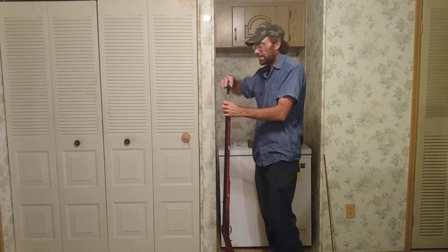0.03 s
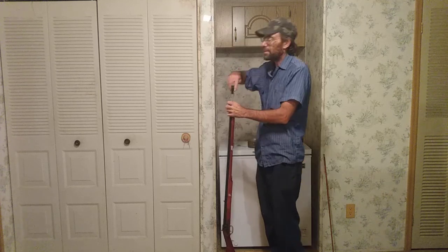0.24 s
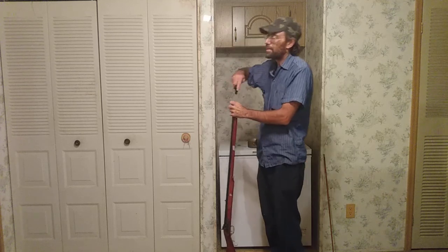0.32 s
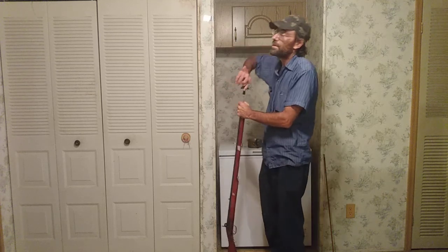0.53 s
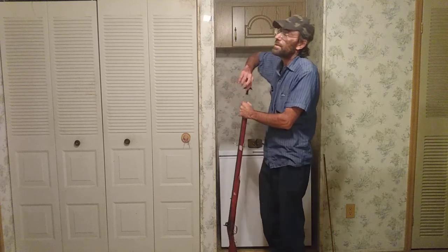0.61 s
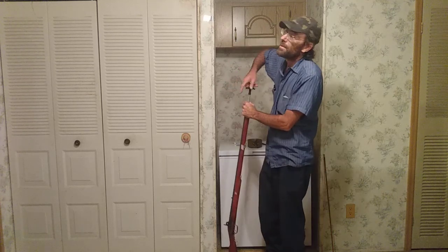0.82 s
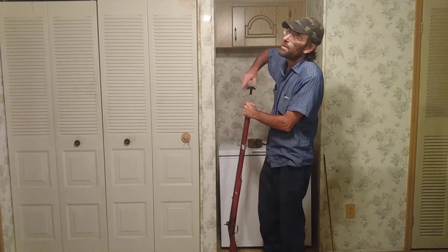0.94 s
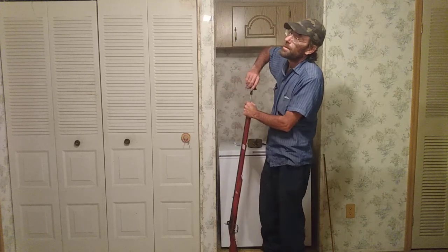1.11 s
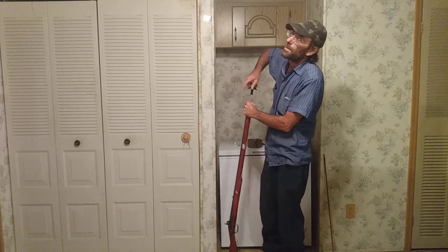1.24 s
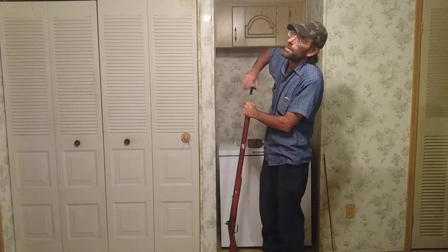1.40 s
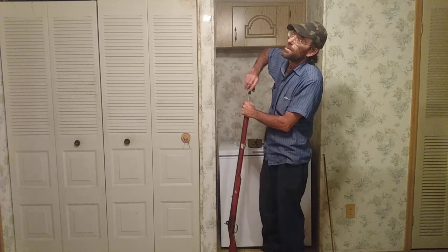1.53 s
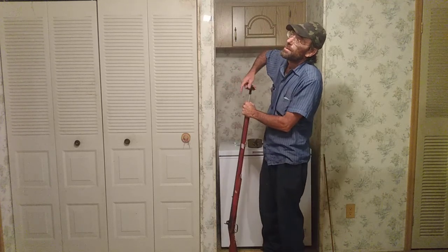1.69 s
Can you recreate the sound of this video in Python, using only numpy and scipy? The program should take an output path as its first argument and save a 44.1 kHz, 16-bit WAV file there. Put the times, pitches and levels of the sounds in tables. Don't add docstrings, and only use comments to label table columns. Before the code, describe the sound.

A metal rod is worked through a long gun barrel in a small room. After near quiet, the wooden stock thumps dully at about 0.2 s. Bright scraping clicks follow at 0.37, then a strong one at 0.6, others at 0.68, 0.9 and 1.06, another strong clack at 1.33, and softer rattles to 1.7. Faint low bumps, short echo and slight hiss lie beneath.

```python
import sys
import numpy as np
from scipy import signal
from scipy.fft import rfft, irfft
from scipy.io import wavfile

SR = 44100
rng = np.random.default_rng(int(sys.argv[2]) if len(sys.argv) > 2 else 0)


def natural_amplitude(level_db):
    exponent = np.asarray(level_db, float) / 20
    return 10 ** exponent


def put_to_file(sound):
    columns = np.atleast_2d(sound).T
    safe = np.clip(columns, -1, 1)
    whole_steps = np.round(safe * 32767)
    wavfile.write(sys.argv[1], SR, whole_steps.astype(np.int16))


N = 77175
LEAD = 4410
SIZE = 32768

# freq_hz, level_db_per_hz
FLOOR_SPECTRUM = [(35, -1.5), (60, 5), (100, -11), (200, -13), (500, -17), (1500, -23), (5000, -26),
                  (16000, -32.5)]
FLOOR_DB, FLOOR_SIDE_GAIN = -80, 0.59
HUM_HZ, HUM_DB = 54, -78

# freq_hz, t60_s
ROOM_T60 = [(300, 0.22), (1300, 0.34), (3500, 0.3), (9000, 0.26), (15000, 0.16)]
ROOM_DB, ROOM_GAP_S, ROOM_BUILD_S = 3, 0.00013, 0.002
EAR_LAG_SAMPLES, PAN_DB = 1, -0.6

# freq_hz, level_db, t60_s
CLANK_MODES = [(520, 2, .12), (1170, .1, .025), (1350, 1, .02), (2330, -1, .03), (2950, .1, .01),
               (3550, -3, .008), (4400, -8, .008), (7000, -18, .003)]
CLANK_START_S, CLANK_DB, CLANK_LENGTH_S = -0.03, -71.5, 0.026

# start_s, peak_db, pitch_hz, length_s
DRONES = [(0.338, -51, 240.5, 0.12), (.44, -72, 238, 0.072), (.29, -49, 116, 0.036),
          (.375, -56.5, 105.4, 0.072), (.81, -61.5, 69, 0.096), (.868, -53, 116.6, 0.078),
          (1.13, -54.5, 140, 0.088), (1.135, -52, 269.2, .035), (1.141, -56, 398, 0.0385),
          (.212, -46, 192, 0.031), (0.21, -43, 109.3, 0.026), (.224, -38, 257, 0.027),
          (1.159, -60, 349, 0.0354), (1.269, -69.5, 119.6, .1)]
DRONE_TAPER, DRONE_FADE_DB = 0.24, -4

# start_s, level_db, centre_hz, push_length_s
BUMPS = [(0.2127, -30.5, 325, 0.0068), (0.2245, -26.5, 262, 0.012), (0.229, -36, 116, 0.034),
         (0.285, -42.5, 129.6, 0.032), (0.319, -42, 250, 0.012), (.385, -52, 112.5, 0.036),
         (.733, -49.5, 98, 0.066), (.755, -56.5, 175, 0.014), (0.832, -61, 66, 0.04),
         (.875, -68, 109, 0.068), (0.962, -61, 84.5, 0.032), (1.081, -52, 166, 0.041),
         (1.127, -48, 238, 0.02), (1.148, -49.5, 399.7, 0.013), (1.14, -52, 140, 0.02),
         (1.201, -54.5, 133.6, 0.047), (1.186, -62.5, 61.7, 0.034), (1.34, -62, 139, 0.076),
         (0.927, -64, 334, 0.04), (1.327, -60, 340, 0.043), (1.584, -66, 353, 0.058),
         (1.44, -72.5, 345, 0.095), (1.701, -69, 350, 0.043)]
# freq_hz, level_db, t60_s
STOCK_MODES = [(56.6, 1, 0.59), (92, 4, 0.1), (116, 7, 0.11), (149.4, -1, 0.15), (191, 6.5, 0.14),
               (238.9, -4.5, 0.41), (257.3, 13, 0.064), (343.3, 3.5, 0.14), (387.7, 7.5, 0.083),
               (426, 9.5, 0.028), (526, -12, 0.058), (565, 19, 0.066)]
BUMP_SPREAD_OCT, BUMP_SIDE_DB, BUMP_GRIT_GAIN, BUMP_ROOM_DB = 0.44, -18.5, 0.53, -11.5
THUD_DB, THUD_T60_S, THUD_BAND_RATIO = -15.5, 0.34, 1.54

# start_s, peak_db, pitch_hz, chatter_length_s
PINGS = [(.365, -51, 1150, 0.027), (0.38, -53.5, 1400, 0.037), (0.518, -53, 3000, .02),
         (0.531, -54.5, 1170, 0.016), (0.528, -52, 3400, 0.024), (0.598, -47.5, 3400, 0.036),
         (.6, -40.5, 10900, .03), (.678, -48.5, 1170, 0.028), (0.677, -49.5, 1415, 0.011),
         (0.681, -47, 10900, 0.016), (.68, -49, 4500, 0.017), (.903, -54.5, 1210, .015),
         (0.897, -47.5, 4260, 0.022), (.945, -51, 1210, .015), (0.949, -48, 4300, 0.014),
         (1.063, -49.5, 1200, 0.0096), (1.067, -51, 5950, 0.028), (1.063, -46, 10900, 0.017),
         (1.196, -52.5, 4300, 0.02), (1.33, -48, 5960, 0.01), (1.332, -47.5, 4450, 0.019),
         (1.36, -48, 4450, 0.014), (1.332, -51.5, 1750, 0.033), (1.359, -57, 1300, 0.018),
         (1.413, -49.5, 4450, 0.026), (1.47, -54.5, 4450, .035), (1.583, -47, 4500, 0.021),
         (1.59, -55, 1120, 0.013), (1.591, -57.5, 1400, 0.028), (1.655, -59, 2100, 0.014),
         (1.58, -53, 5960, 0.024), (0.604, -56, 892, .05), (.62, -60.5, 656, 0.077), (.72, -61, 716, .05),
         (1.336, -59, 720, 0.049), (1.655, -60, 695, 0.032), (1.675, -58, 3400, 0.023),
         (.48, -62.5, 2300, .02), (0.317, -56.5, 3320, 0.014), (.37, -52.5, 3400, 0.033),
         (0.966, -57.5, 1220, 0.03), (0.699, -56.5, 1394, .04), (1.1, -59, 892, 0.052)]
PING_T60_S, PING_SPLIT_RATIO, PING_ROOM_DB = 0.018, 0.016, -8.5

# start_s, level_db, chatter_length_s, brightness_db_per_oct, hollow_ring_db
JERKS = [(0.294, -55.5, 0.013, -7.5, -20), (0.32, -46, 0.033, -4.5, -19), (0.3594, -40.5, 0.0077, -2.6, 2),
         (0.3728, -35.5, 0.0056, 2.4, 5.5), (0.4801, -56, 0.044, -6, -34), (0.5162, -44, 0.014, 0.2, 4.5),
         (0.532, -48.5, 0.0079, -5, 0.1), (0.5972, -30, 0.027, 1.5, 3.5), (0.6735, -38, 0.021, -1.5, 1.8),
         (0.859, -43.5, 0.024, -0.3, 2.5), (0.8989, -37.5, 0.0098, 0.2, 5), (0.9422, -44, 0.01, -2, 9.5),
         (1.0605, -36, 0.011, 0.2, 5), (1.1777, -44, 0.013, -0.5, 5.5), (1.192, -43, 0.011, -1.5, 1),
         (1.3271, -30.5, 0.024, 1.8, 7.5), (1.36, -39.5, 0.0051, -2, 12.5), (1.413, -44, 0.016, -2.4, -5),
         (1.467, -43, 0.016, -2.4, 2), (1.554, -47, 0.0099, -2.5, -1.5), (1.582, -39.5, 0.028, -2.5, -1.5),
         (1.6535, -45.5, 0.018, -5, -6), (1.7195, -49, 0.012, -3.5, -6)]
# start_s, level_db, chatter_length_s, brightness_db_per_oct,
# hollow_ring_db
SLIPS = [(0.21, -51, 0.041, -8.5, -7), (0.752, -49.5, 0.019, -5, 1), (0.816, -72.5, 0.034, -6, 10),
         (1.08, -41, 0.069, -2, -18), (1.137, -51.5, 0.059, -6, -6), (0.68, -43.5, 0.008, -3.5, -13),
         (0.681, -44.5, 0.026, -1.5, 8), (1.33, -36, 0.0055, 2.5, 6), (0.47, -59, 0.0085, 2.5, 15),
         (1.2, -48.5, 0.0094, -3, -2.5), (1.7, -49, 0.011, -3.5, -2.5), (1.575, -43.5, 0.013, -1.7, 3.5),
         (1.594, -59, 0.011, -1, 3), (1.2, -40.5, 0.0039, -0.5, 7.5), (1.3, -71, .004, 19, -5)]
# freq_hz, level_db, t60_s
ROD_MODES = [(698, -12.5, 0.044), (1178, 7.5, 0.041), (1393, 7, 0.038), (1755, 2.5, 0.047),
             (2164, 8, 0.014), (3474, 4.5, 0.029), (4010, 10.5, 0.019), (4446, 11.5, 0.028),
             (6010, 8.5, 0.038), (10050, 12, 0.036), (10400, 10.5, 0.032), (10860, 23, 0.0092),
             (10820, 22.5, 0.004)]
# freq_hz, level_db_per_hz
SCRAPE = [(300, -24.5), (550, -26.5), (900, -12.5), (1580, -14), (2500, -1.5), (7000, -2.5), (11000, 1.5),
          (15500, -5)]
ROD_DB, RING_DB, MODE_SCATTER_DB = -20.5, 5, 1.5
HOLLOW_BELOW_HZ, PLACES = 4800, 4
CLICKS_PER_S, CLICK_SCATTER_DB, RISE_S = 7000, 3.0, 0.0006
CLUMP_S, CLUMP_DB = 0.00324, 3.5
STRIKE_DB, STRIKE_S, TICK_DB, TICK_S = -13.5, 0.0079, -3.5, 0.0011


def unit(x):
    return x / np.sqrt(np.mean(np.abs(x) ** 2) + 1e-30)


def colour(table, hz):
    table = np.array(table)
    return np.interp(np.log(hz + 1), np.log(table[:, 0]), table[:, 1])


def causal(db):
    cepstrum = irfft(db * np.log(10) / 20)
    half = len(cepstrum) // 2
    cepstrum[1:half] *= 2
    cepstrum[half + 1:] = 0
    return np.exp(rfft(cepstrum))


def rings(modes):
    hz, db, t60_s = np.array(modes).T[:, :, None]
    t = np.arange(SIZE) / SR
    return natural_amplitude(db) * np.sin(2 * np.pi * hz * t) * np.exp(-np.log(1000) * t / np.abs(t60_s))


def add(track, start_s, sound):
    i = int(start_s * SR) + LEAD
    track[..., i:i + sound.shape[-1]] += sound[..., :track.shape[-1] - i]


def floor():
    hz = np.arange(N // 2 + 1) * SR / N
    mid, side = irfft(rfft(rng.standard_normal((2, N))) * natural_amplitude(colour(FLOOR_SPECTRUM, hz)), N)
    hiss = unit(mid + FLOOR_SIDE_GAIN * side * np.array([[1], [-1]]))
    hum = np.sin(2 * np.pi * HUM_HZ * np.arange(N) / SR)
    return natural_amplitude(FLOOR_DB) * hiss + natural_amplitude(HUM_DB) * hum


def room(x):
    t = np.arange(SIZE) / SR
    hz = np.arange(SIZE // 2 + 1) * SR / SIZE
    noise = rfft(rng.standard_normal((2, SIZE)))
    octave = np.log2(np.clip(hz, 125, 16000) / 1000)
    tail = 0
    for k in range(-3, 5):
        share = np.clip(1 - np.abs(octave - k), 0, 1)
        t60_s = colour(ROOM_T60, 1000 * 2. ** k)
        tail = tail + irfft(noise * share) * np.exp(-np.log(1000) * t / t60_s)
    tail = tail * (1 - np.exp(-np.clip(t - ROOM_GAP_S, 0, None) / ROOM_BUILD_S))
    tail = natural_amplitude(ROOM_DB) * tail / np.sqrt(np.sum(tail ** 2, axis=1, keepdims=True))
    direct = np.array([x, np.roll(x, EAR_LAG_SAMPLES)])
    return direct + signal.fftconvolve(x[None], tail, axes=1)[:, :len(x)]


def clank():
    out = np.zeros(N + LEAD)
    t = np.arange(SIZE // 8) / SR
    rattle = rng.standard_normal(len(t)) * np.exp(-(t / CLANK_LENGTH_S) ** 2)
    response = np.diff(rings(CLANK_MODES).sum(axis=0))
    rung = signal.fftconvolve(rattle, response)[:SIZE // 4]
    add(out, CLANK_START_S, natural_amplitude(CLANK_DB) * unit(rung))
    return out


def drones():
    out = np.zeros(N + LEAD)
    for start_s, peak_db, pitch_hz, length_s in DRONES:
        t = np.arange(int(length_s * SR)) / SR
        shape = signal.windows.tukey(len(t), DRONE_TAPER) * natural_amplitude(DRONE_FADE_DB * t / length_s)
        add(out, start_s, natural_amplitude(peak_db) * shape * np.sin(2 * np.pi * pitch_hz * t))
    return out


def stock():
    out = np.zeros((2, N + LEAD))
    t = np.arange(SIZE // 2) / SR
    modes = rings(STOCK_MODES)
    mode_hz = np.array(STOCK_MODES)[:, 0]
    for start_s, level_db, centre_hz, push_s in BUMPS:
        near = np.exp(-0.5 * (np.log2(mode_hz / centre_hz) / BUMP_SPREAD_OCT) ** 2)
        band_hz = [centre_hz / THUD_BAND_RATIO, centre_hz * THUD_BAND_RATIO]
        band = signal.butter(2, band_hz, "band", fs=SR, output="sos")
        grit = unit(signal.sosfilt(band, rng.standard_normal((2, len(t)))))
        phase = 2 * np.pi * centre_hz * t
        wobble = -np.array([np.sin(phase), np.cos(phase)]) + BUMP_GRIT_GAIN * grit
        contact = np.clip(t / push_s, 0, 1)
        push = wobble * np.sin(np.pi * contact)
        rung = signal.fftconvolve(push, (near @ modes)[None], axes=1)[:, :len(t)]
        thud = natural_amplitude(THUD_DB) * grit * contact * natural_amplitude(-60 * t / THUD_T60_S)
        mid, side = rung / np.abs(rung[0]).max() + thud
        add(out, start_s, natural_amplitude(level_db) * (mid + natural_amplitude(BUMP_SIDE_DB) * side * np.array([[1], [-1]])))
    return out


def pings():
    out = np.zeros(N + LEAD)
    t = np.arange(SIZE // 8) / SR
    for start_s, peak_db, pitch_hz, length_s in PINGS:
        push = np.sin(np.pi * np.clip(t / length_s, 0, 1))
        rattle = rng.standard_normal(len(t)) * push
        beat = np.cos(2 * np.pi * pitch_hz * PING_SPLIT_RATIO * t)
        mode = np.sin(2 * np.pi * pitch_hz * t) * beat * natural_amplitude(-60 * t / PING_T60_S)
        rung = signal.fftconvolve(rattle, mode)[:len(t)]
        rung = signal.fftconvolve(rung, mode)[:len(t)]
        add(out, start_s, natural_amplitude(peak_db) * rung / np.abs(rung).max())
    return out


def rod():
    out = np.zeros((PLACES, N + LEAD))
    hz = np.arange(SIZE // 2 + 1) * SR / SIZE
    t = np.arange(SIZE // 4) / SR
    low_cuts = [causal(40 * np.log10(np.clip(hz / f, 0.01, 1))) for f, _, _ in ROD_MODES]
    modes = rfft(rings(ROD_MODES)) * low_cuts
    ring_gain = natural_amplitude(RING_DB) / np.abs(modes).max()
    hollow = np.array(ROD_MODES)[:, 0] < HOLLOW_BELOW_HZ
    scrape = causal(colour(SCRAPE, hz))
    for k, (start_s, level_db, length_s, bright_db, ring_db) in enumerate(list(JERKS) + list(SLIPS)):
        mode_db = MODE_SCATTER_DB * rng.standard_normal(len(ROD_MODES)) + ring_db * hollow
        mix = natural_amplitude(mode_db) * rng.choice([-1, 1], len(ROD_MODES))

        hit, size, sign = rng.random((3, len(t)))
        click_gain = natural_amplitude(-CLICK_SCATTER_DB * np.log(size + 1 / 60))
        clicks = (hit < CLICKS_PER_S / SR) * click_gain * np.sign(sign - 0.5)

        clumps = np.interp(t, np.arange(200) * CLUMP_S, rng.standard_normal(200))
        strike = natural_amplitude(STRIKE_DB) * np.exp(-t / STRIKE_S)
        tick = natural_amplitude(TICK_DB) * np.exp(-t / TICK_S)
        shape = (1 - np.exp(-(t + 1 / SR) / RISE_S)) * np.exp(-(t / length_s) ** 2)
        shape = shape * (natural_amplitude(CLUMP_DB * clumps) + strike + tick)

        tilt = causal(bright_db * np.log2(np.clip(hz, 1100, 16000) / 4000))
        body = scrape + ring_gain * (mix @ modes)
        chatter = irfft(rfft(unit(clicks) * shape, SIZE) * tilt * body)[:SIZE // 2]
        add(out[k % PLACES], start_s, natural_amplitude(level_db + ROD_DB) * unit(chatter))
    return out


def scene():
    hush = floor()
    bumps = stock() + drones()
    knocks = pings()
    near = room(clank())
    near = near + bumps + natural_amplitude(BUMP_ROOM_DB) * room(bumps.mean(axis=0))
    near = near + knocks + natural_amplitude(PING_ROOM_DB) * room(knocks)
    near = near + sum(room(x) for x in rod())
    pan = natural_amplitude(np.array([[PAN_DB], [-PAN_DB]]) / 2)
    return near[:, LEAD:] * pan + hush


def band_limit(x):
    return signal.sosfilt(signal.butter(12, 16650, fs=SR, output="sos"), x)


def record(dry):
    low_cut = signal.butter(3, 42, "high", fs=SR, output="sos")
    top_cut = signal.ellip(8, 0.2, 70, 15800, fs=SR, output="sos")
    mix = signal.sosfilt(top_cut, signal.sosfilt(low_cut, dry))
    return band_limit(mix)


dry = scene()
out = record(dry)
put_to_file(out)
```